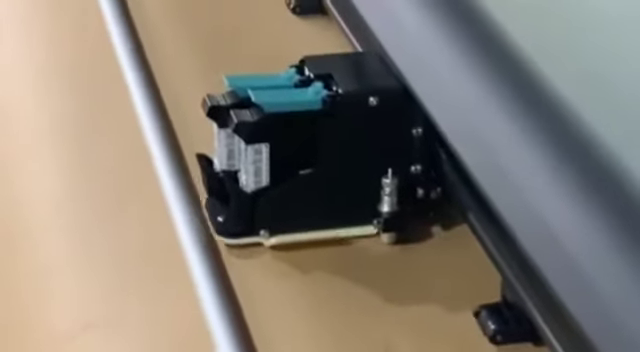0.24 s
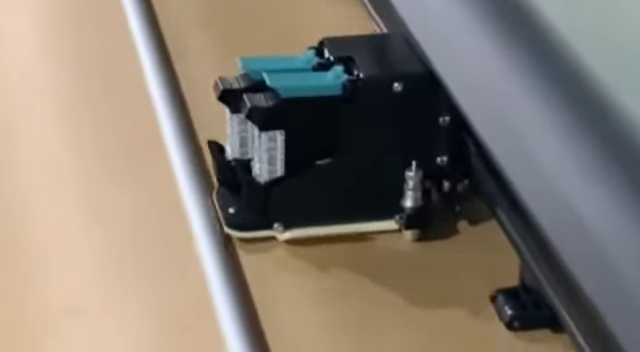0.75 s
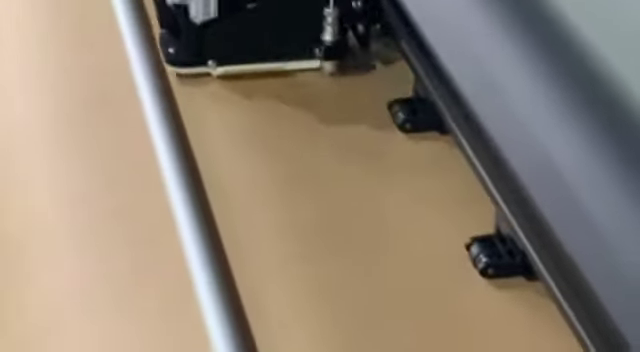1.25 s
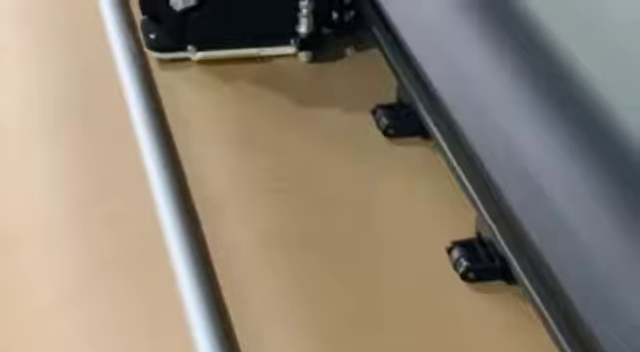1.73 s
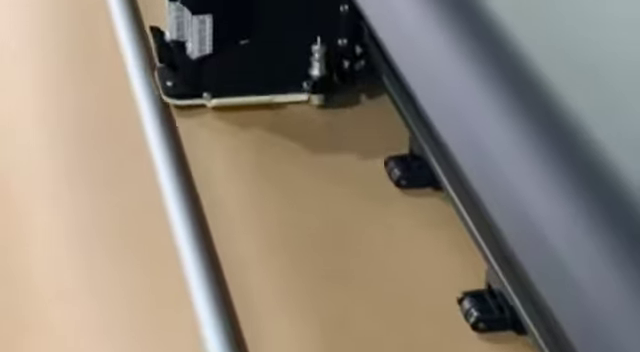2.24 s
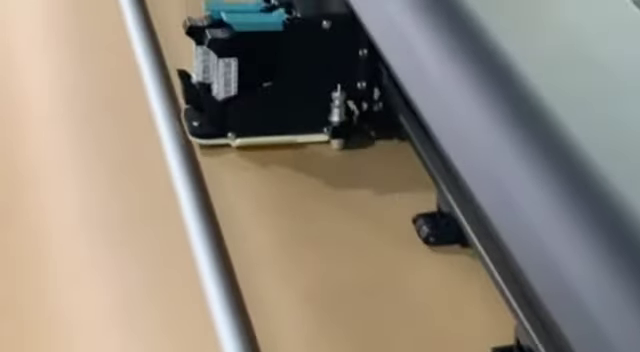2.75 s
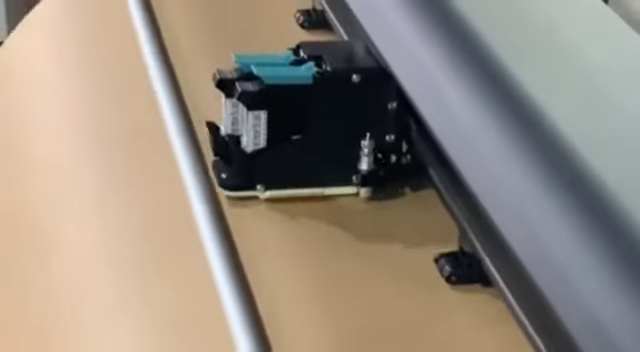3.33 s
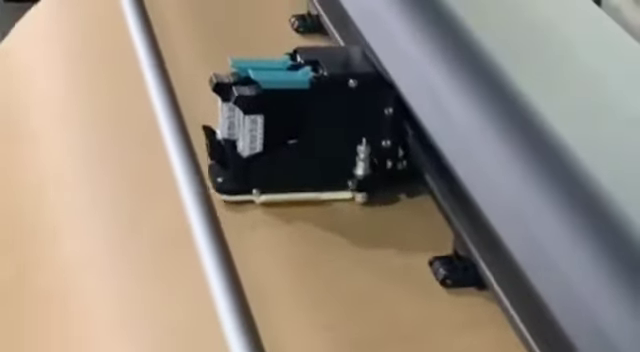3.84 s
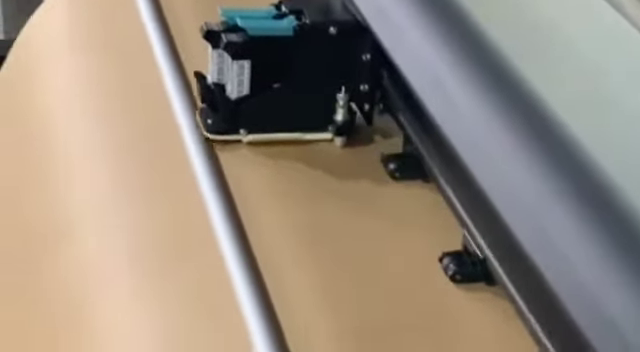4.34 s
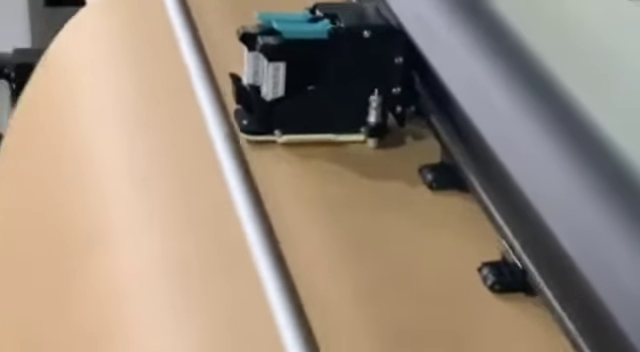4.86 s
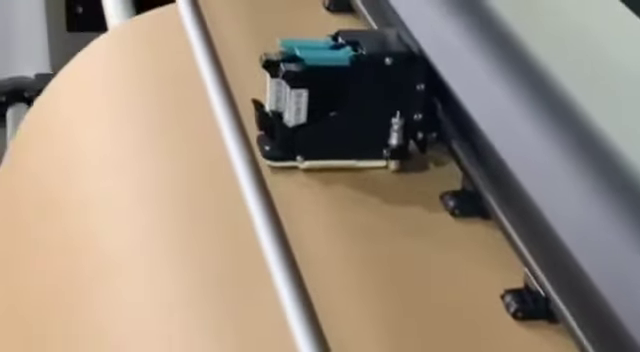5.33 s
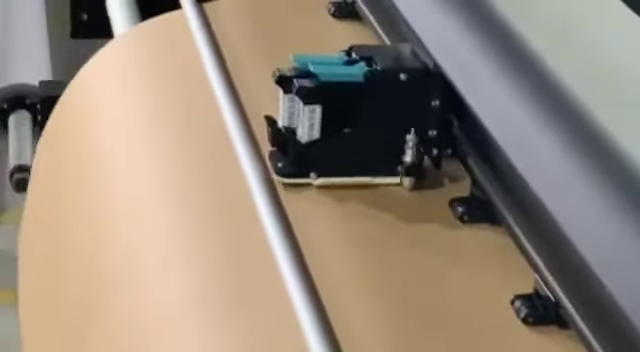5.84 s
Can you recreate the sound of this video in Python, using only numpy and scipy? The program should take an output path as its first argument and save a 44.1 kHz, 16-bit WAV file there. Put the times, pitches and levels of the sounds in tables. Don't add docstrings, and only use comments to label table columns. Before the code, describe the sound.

In a large workshop, a phone held within arm's reach of a plotter hears its carriage jog over paper. From 0 to 1.3 seconds come four short whines, each swooping up to around 1 to 1.4 kilohertz and quickly down, with a swell of bright hiss and a short hall ring. A hard belt knock lands near 0.4. From about 1.3 to 2.8 the whine rests: faint sliding creeps, crisp cable ticks near 1.4, 1.8 and 2.4 to 2.5, and thin high squeaks at 2.0 and 2.6. Jogs resume from 2.85 to 5.5, alternating lower and higher, with a knock at 3.2. Dull low booms recur as paper is tugged, and a faint 6-kilohertz drive tone switches on and off. A small squeak at 5.7 precedes the sharpest knock at 5.84 and a last, lower jog near 5.95. A deep compressor throb and fan rumble continue throughout.

```python
import sys
import numpy as np
from scipy import signal
from scipy.fft import rfft, irfft
from scipy.io import wavfile
from scipy.ndimage import uniform_filter1d

SR = 44100
rng = np.random.default_rng(int(sys.argv[2]) if len(sys.argv) > 2 else 0)


def ratio(d):
    e = np.asarray(d, float) / 20
    return 10 ** e


def wrap_up_sound(samples):
    columns = np.atleast_2d(samples).T
    tamed = np.clip(columns, -1, 1)
    steps = np.round(tamed * 32767).astype(np.int16)
    wavfile.write(sys.argv[1], SR, steps)


N = 268375
T = np.arange(N) / SR
F = np.maximum(np.arange(N // 2 + 1) * SR / N, 1)

# centre_s, half_length_s, top_tooth_rate_hz, arch_squareness, level_db
BELT_JOGS = [(.09, 0.14, 980, 2.2, -34.5), (0.401, 0.11, 1290, 2.6, -34.5), (0.758, 0.14, 1020, 2.12, -34),
             (1.127, .153, 1410, 2.11, -34.5), (2.959, 0.12, 990, 2.7, -35),
             (3.269, 0.091, 1300, 2.57, -33), (3.629, 0.13, 1020, 2.41, -34.5),
             (3.979, 0.12, 1005, 2.42, -34), (4.375, .12, 1000, 2.3, -35), (4.686, 0.099, 1290, 2.64, -33),
             (5.044, 0.13, 1012, 2.23, -35.5), (5.353, 0.11, 1300, 2.21, -32.5),
             (5.953, .092, 840, 2.22, -35.5)]
# pitch_hz, gain_db
FRAME_PANELS = [(300, -6), (620, 0), (800, 4.5), (890, 0), (985, 1.5), (1150, -.5), (1450, -7), (2000, -1),
                (3000, -6)]
# centre_s, half_length_s, level_db
CARRIAGE_SLIDES = [(0.077, .12, -35.5), (0.386, 0.12, -34), (0.734, 0.15, -34.5), (1.116, 0.16, -33),
                   (1.467, 0.061, -46.5), (1.67, 0.066, -50.5), (1.974, 0.093, -47.5), (2.214, 0.067, -44),
                   (2.6, 0.12, -52), (2.944, .13, -36), (3.258, 0.11, -34.5), (3.605, 0.14, -36),
                   (3.963, .13, -36.5), (4.358, 0.13, -35.5), (4.674, 0.11, -33.5), (5.026, 0.14, -34.5),
                   (5.347, 0.12, -33.5), (5.607, 0.22, -55), (5.939, 0.091, -37)]
# pitch_hz, level_db_per_hz
SLIDE_SPECTRUM = [(300, -46), (600, -40), (1000, -39), (1500, -37), (2050, -31), (2700, -35), (3500, -35),
                  (4300, -31), (5100, -36), (6500, -34), (8200, -32), (12500, -32), (14200, -38),
                  (15600, -35)]
# centre_s, level_db
PAPER_BOOMS = [(.04, -32), (0.221, -27), (.39, -24), (.54, -30), (.92, -28), (1.59, -30.5), (2.3, -38),
               (2.43, -35), (2.81, -40), (3.13, -33), (3.25, -24), (3.43, -27.5), (3.63, -35), (4.53, -31),
               (4.8, -25.5), (5.341, -24.5), (5.851, -38)]
# pitch_hz, level_db_per_hz
FEED_SPECTRUM = [(90, -39.5), (150, -26), (230, -21), (310, -28.5), (450, -35.5), (700, -59.5)]
# start_s, end_s, level_db
DRIVE_BURSTS = [
    (0.045, 0.248, -52),
    (0.516, 0.914, -49),
    (1.352, 1.547, -51.5),
    (1.765, 2.122, -55.5),
    (2.38, 3.12, -52.5),
    (3.45, 3.784, -51.5),
    (4.2, 4.525, -55),
    (4.881, 5.21, -52),
]
# centre_s, half_length_s, pitch_hz, level_db
ROLLER_SQUEAKS = [
    (.55, 0.065, 2660, -45),
    (2.025, 0.043, 7860, -45),
    (2.614, 0.077, 8100, -45),
    (5.697, .09, 8100, -46),
]
# start_s, peak_db
CABLE_TICKS = [
    (1.3578, -38.5),
    (1.793, -34),
    (2.382, -39),
    (2.5166, -38),
    (4.8416, -36),
    (5.8396, -38),
]
# start_s, peak_db
BELT_KNOCKS = [
    (0.3244, -37),
    (0.3744, -27),
    (3.237, -32),
    (4.5984, -48),
    (5.838, -23),
]
# multiple_of_shaft_rate, level_db
SHAFT_MULTIPLES = [(1, -41), (2, -27.5), (3, -38.5), (4, -39), (5, -43), (6, -42)]
# pitch_hz, level_db_per_hz
SHOP_SPECTRUM = [(24, -80), (33, -71), (50, -46.5), (100, -52), (135, -55.5), (230, -53.5), (310, -58.5),
                 (400, -61), (630, -65), (1000, -67.5), (2000, -73), (4000, -79.5), (6000, -86),
                 (9000, -108), (15600, -104)]
# delay_s, level_db
WALL_ECHOES = [
    (.034, -9),
    (.066, -6),
    (.125, -10),
]
# pitch_hz, likeness_0_to_1, left_minus_right_db
MIC_PORTS = [(60, 0.92, 3), (206, 0.95, 0.6), (326, 0.74, -0.4), (684, 0.02, 7), (980, 0.14, 4.5),
             (3640, 0, 1.1), (5380, 0.08, -2), (6500, 1, 4)]
# pitch_hz, likeness_0_to_1, phase_turns
TREBLE_PATH = [(5800, 0, -.2), (6300, .7, -.1), (6850, .8, .16), (7700, .86, .345), (9200, .86, .655),
               (10300, .86, .845), (11700, .88, 1.155), (12600, .9, 1.345), (14400, .9, 1.655),
               (15000, .9, 1.845), (15800, .9, 2.05)]


def over_hz(table, column=1):
    rows = np.array(table, float)
    return np.interp(np.log(F), np.log(rows[:, 0]), rows[:, column])


def walk(rate):
    hold = int(SR / rate)
    steps = np.repeat(rng.standard_normal(N // hold + 1), hold)
    wander = uniform_filter1d(uniform_filter1d(steps, hold), hold)[:N]
    return wander / wander.std()


def lean():
    half_db = over_hz(MIC_PORTS, column=2) / 2
    return ratio(np.array([half_db, -half_db]))


def ported_noise(colour, grain_db):
    grain = ratio(grain_db * rng.standard_normal(N))
    grain = grain / np.sqrt(np.mean(grain ** 2))
    near, other = rfft(grain * rng.standard_normal((2, N)))
    alike = np.clip(np.maximum(over_hz(MIC_PORTS), over_hz(TREBLE_PATH)), 0, 1)
    turn = np.exp(2j * np.pi * over_hz(TREBLE_PATH, column=2) * (F > TREBLE_PATH[0][0]))
    far = alike * turn * near + np.sqrt(1 - alike ** 2) * other
    return np.array([near, far]) * lean() * ratio(over_hz(colour)) * np.sqrt(SR / 2)


def flickering(pair, shared_db, own_db, rate):
    out, swell = 0, walk(1.63)
    for hz in 20 * 2. ** np.arange(11):
        share = np.clip(1 - np.abs(np.log2(F / hz)), 0, 1)
        out = out + irfft(pair * share, N) * ratio(shared_db * swell + own_db * walk(rate))
    return out


def hall(x, wet_db):
    bass_t60_s, treble_t60_s = 1.4, .5
    t = T[:2 * SR]
    noise = rng.standard_normal((2, len(t)))
    bass = signal.sosfilt(signal.butter(2, 2500, fs=SR, output="sos"), noise)
    tail = bass * ratio(-60 * t / bass_t60_s) + (noise - bass) * ratio(-60 * t / treble_t60_s)
    tail = tail * np.clip(t / .02, 0, 1) * ratio(wet_db) / np.sqrt(SR / 10)
    tail[:, 0] = 1
    for delay_s, db in WALL_ECHOES:
        start = int(delay_s * SR)
        tail[[0, 1], [start, start + 22]] = ratio(db)
    return signal.fftconvolve(np.atleast_2d(x), tail, axes=1)[:, :N]


def belt():
    brake_share, brake_db, tooth_jitter = .9, -4.5, 0.0211
    hz, gain = np.zeros(N), np.zeros(N)
    for centre, half, top_hz, square, db in BELT_JOGS:
        reach = half * np.where(T > centre, brake_share, 1)
        speed = np.clip(1 - np.abs((T - centre) / reach) ** square, 0, 1)
        hz += top_hz * speed
        braking = np.clip((T - centre) / half, 0, 1)
        gain += ratio(db + brake_db * braking) * speed ** .3
    phase = 2 * np.pi * np.cumsum(hz * (1 + tooth_jitter * walk(150))) / SR
    teeth = np.sin(phase) + ratio(-23) * np.sin(2 * phase)
    teeth = gain * ratio(3.5 * walk(70)) * teeth
    panels = ratio(5.5 + over_hz(FRAME_PANELS))
    left, right = irfft(rfft(hall(teeth, 0.14)) * panels * lean(), N)
    return np.array([left, np.roll(right, 8)])


def slide():
    coast_s, rest_db = 0.056, -61.5
    push = 0
    for centre, half, db in CARRIAGE_SLIDES:
        speed = np.clip(1 - np.abs((T - centre) / half) ** 1.96, 0, 1)
        push = push + ratio(db) * speed ** 1.56
    keep = np.exp(-1 / (coast_s * SR))
    coast = signal.lfilter([1 - keep], [1, -keep], push, zi=[push[0] * keep])[0]
    effort = ratio(rest_db) + coast / 2 + push / 2
    hiss = effort * flickering(ported_noise(SLIDE_SPECTRUM, 2.5), .2, 1.3, 20)
    dull = signal.sosfilt(signal.butter(2, 3000, fs=SR, output="sos"), hiss[0])
    return hiss + ratio(-2.5) * (hall(dull, -1.) - dull)


def feed():
    steady_db, boom_s = -31, 0.034
    tug = ratio(steady_db) + sum(ratio(db) * np.exp(-((T - s) / boom_s) ** 2) for s, db in PAPER_BOOMS)
    return tug * ratio(1.9 * walk(20)) * irfft(ported_noise(FEED_SPECTRUM, 0), N)


def drive():
    carrier_hz = 6000
    gate = sum(ratio(db) * ((T > on) & (T < off)) for on, off, db in DRIVE_BURSTS)
    gate = uniform_filter1d(gate, size=600)
    ports = []
    for db, turn in ((1.5, 0), (4.5, .9)):
        tone = np.sin(2 * np.pi * carrier_hz * T + turn)
        ports.append(gate * ratio(db + 2. * walk(12)) * tone)
    return np.array(ports)


def squeaks():
    pair = ported_noise([(100, 0), (200, 0)], 0)
    out = 0
    for centre, half, hz, db in ROLLER_SQUEAKS:
        swell = ratio(db - 27) * np.exp(-((T - centre) / half) ** 4)
        out = out + swell * irfft(pair / (1 + (2 * (F - hz) / 1300) ** 4), N)
    return out


def hits(table, lo_hz, hi_hz, fade_s, boost_db):
    swell = sum(ratio(db + boost_db) * (T >= s) * np.exp(-np.abs(T - s) / fade_s) for s, db in table)
    band = signal.butter(2, [lo_hz, hi_hz], "band", fs=SR, output="sos")
    return signal.sosfilt(band, swell * rng.standard_normal((2, N)))


def ticks():
    return hits(CABLE_TICKS, 6000, 15500, .0015, 12.)


def knocks():
    return hits(BELT_KNOCKS, 600, 3500, .004, 2.5)


def compressor():
    shaft_hz, mains_hz, mains_db = 38.48, 293.7, -39.5
    phase = 2 * np.pi * np.cumsum(shaft_hz * (1 + 0.00257 * walk(1.507))) / SR
    throb = 0
    for k, db in SHAFT_MULTIPLES:
        throb = throb + ratio(db + 0.15 * walk(2.63)) * np.cos(k * phase + 0.299 * k * k)
    hum = ratio(mains_db + 2.0 * walk(3.93)) * np.sin(2 * np.pi * mains_hz * T)
    return np.sqrt(2) * irfft(rfft(throb + hum) * lean(), N)


def shop():
    return flickering(ported_noise(SHOP_SPECTRUM, 0), 0.6, 1.95, 7)


def scene():
    carriage = belt() + slide() + feed() + drive()
    small = squeaks() + ticks() + knocks()
    return carriage + small + compressor() + shop()


def roll_off(x):
    return signal.sosfilt(signal.butter(12, 17020, fs=SR, output="sos"), x)


def record(dry):
    alike_from_hz, sparse_from_hz, top_hz = 6200, 4300, 15750
    drop_db, weak_db = -4, -.5
    hz, _, (left, right) = signal.stft(dry, SR, nperseg=2048)
    hz = hz[:, None]
    pair = np.array([left + right, left - right]) / 2
    line_power = np.abs(pair) ** 2
    power = uniform_filter1d(line_power, size=13, axis=1)
    waver = np.repeat(rng.standard_normal((65, left.shape[1])), 16, axis=0)[:len(hz)]
    keep = (power > power[::-1] * ratio(2 * (drop_db + 3. * waver))) | (hz < alike_from_hz)
    strong = (line_power > power * ratio(2 * weak_db)) | (hz < sparse_from_hz)
    both, apart = pair * keep * strong * (hz < top_hz)
    mix = signal.istft(np.array([both + apart, both - apart]), SR, nperseg=2048)[1][:, :N]
    return roll_off(mix)


dry = scene()
out = record(dry)
wrap_up_sound(out)
```